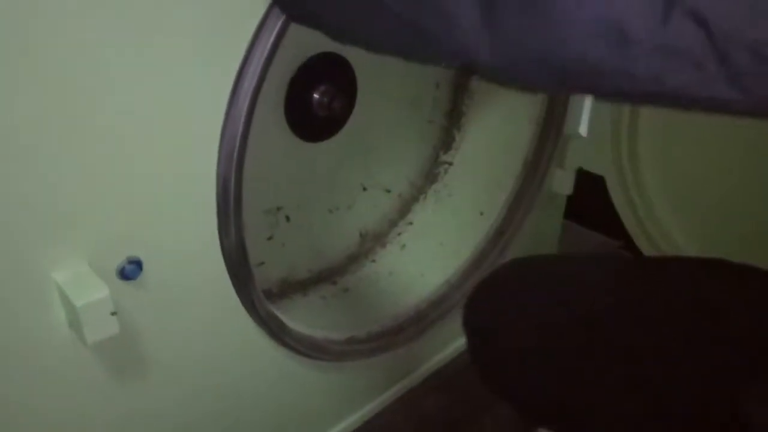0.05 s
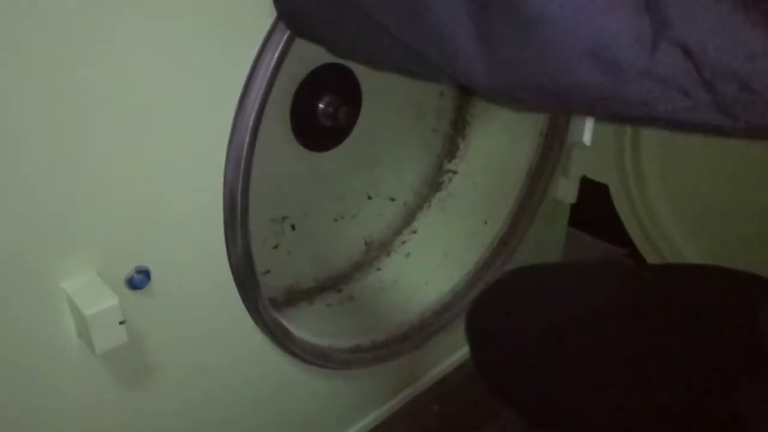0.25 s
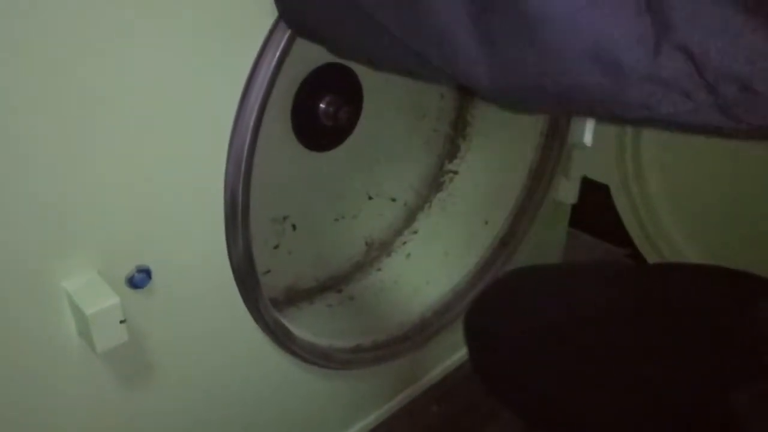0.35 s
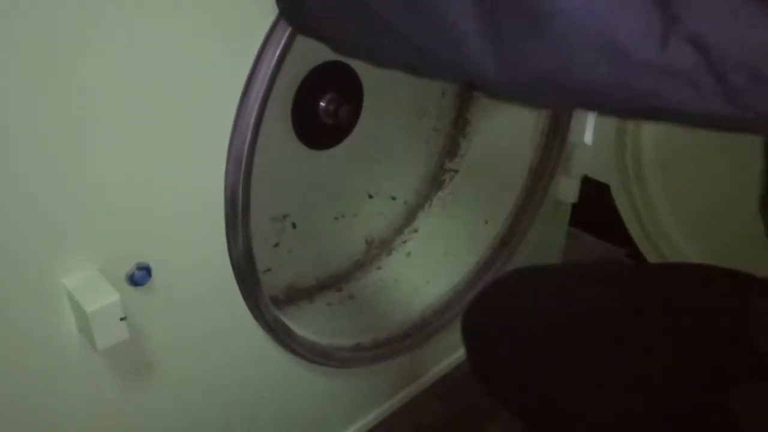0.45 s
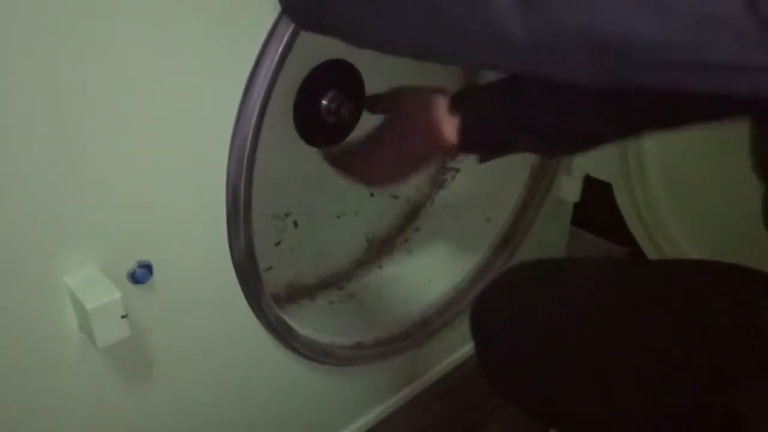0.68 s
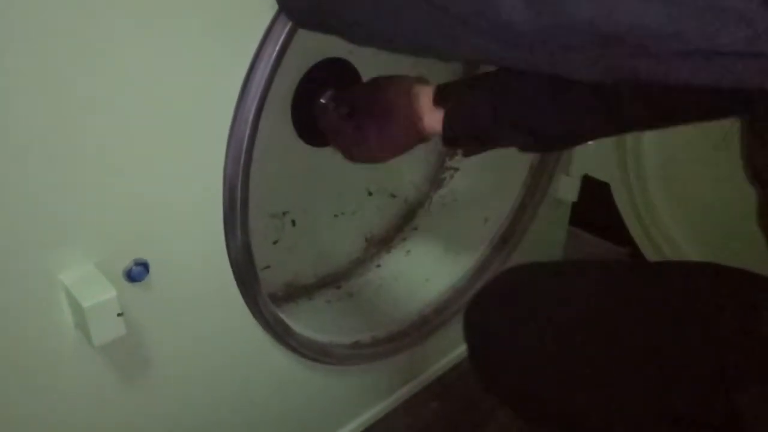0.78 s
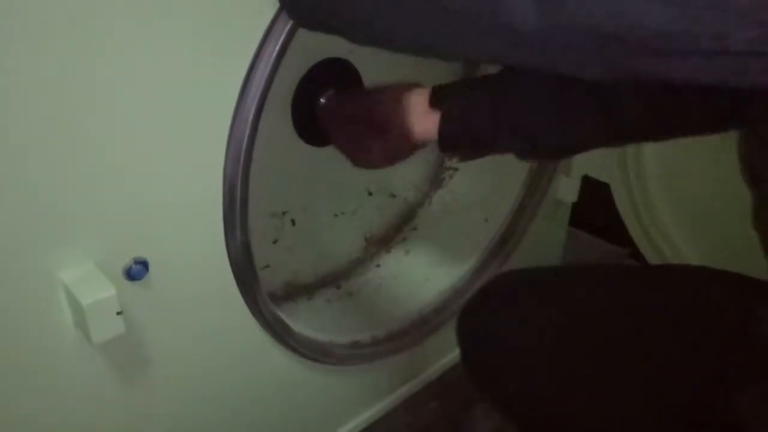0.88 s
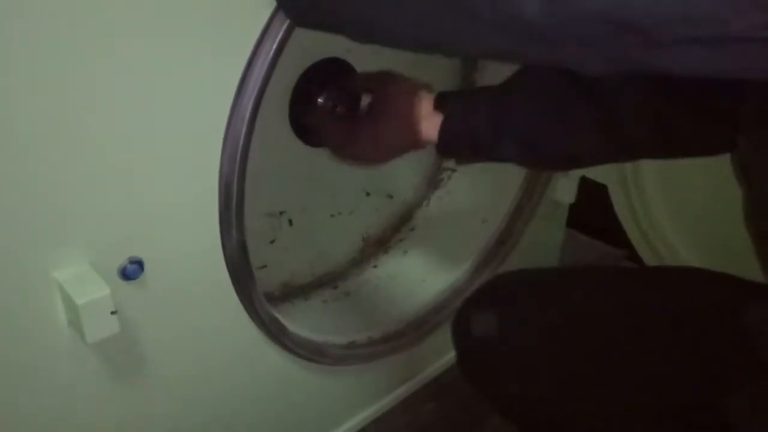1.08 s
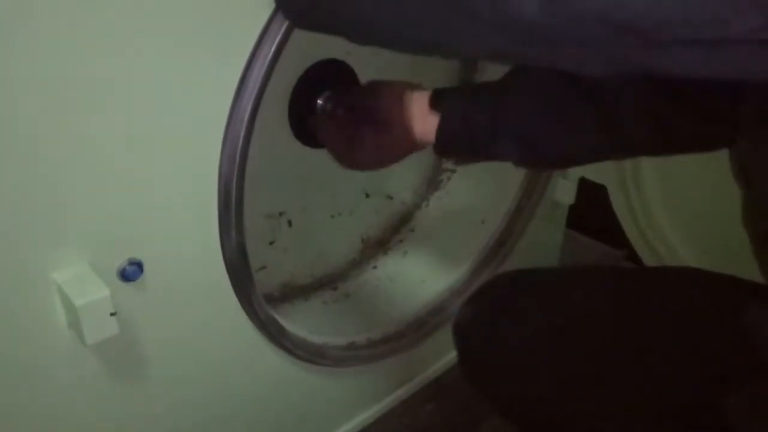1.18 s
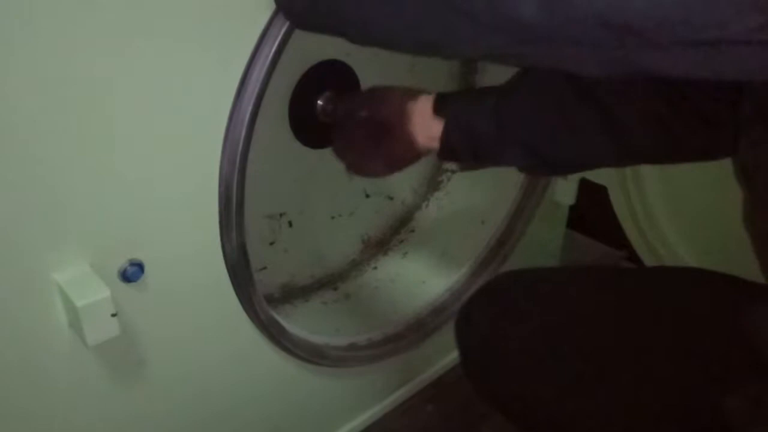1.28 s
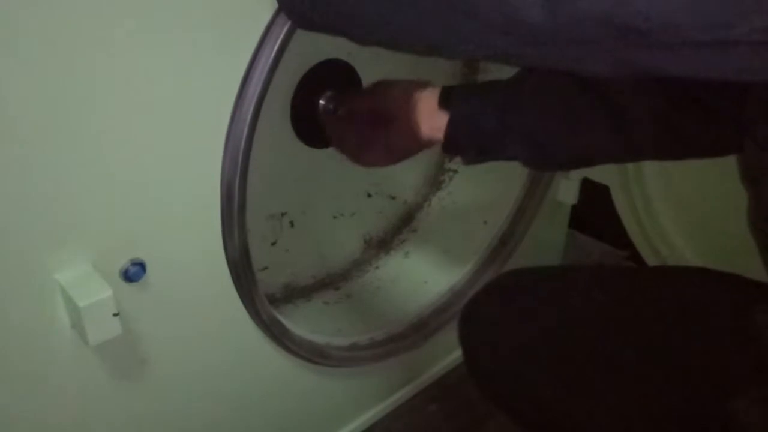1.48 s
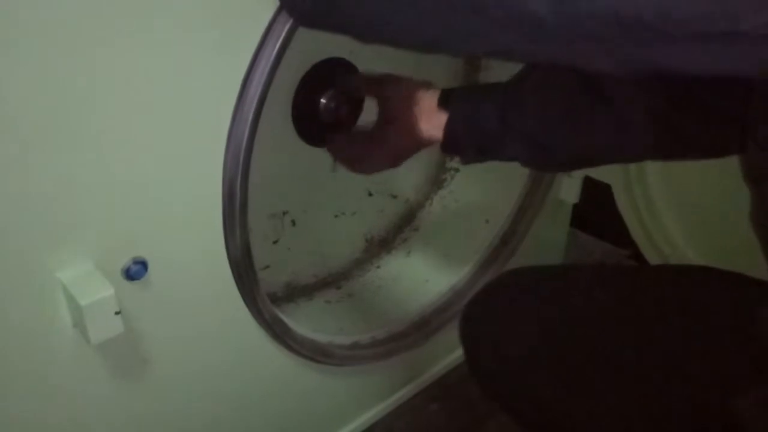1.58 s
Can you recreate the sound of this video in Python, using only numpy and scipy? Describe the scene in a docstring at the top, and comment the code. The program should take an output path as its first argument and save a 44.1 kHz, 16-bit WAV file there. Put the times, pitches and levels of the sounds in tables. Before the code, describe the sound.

A steel machine door clanks shut and rings, followed by one small knob click.

```python
"""Steel machine door clanking shut

A first contact, then the full blow and a short rattle: the steel cracks, the frame knocks, and the
door rings on into a hard-walled workshop over a machine hum. A hand brushes the door; its knob clicks
once, with a faint after-tick. A limiter ducks just ahead of the blows and recovers as the ring dies."""
import sys
import numpy as np
from scipy import signal
from scipy.fft import rfft, irfft, next_fast_len
from scipy.io import wavfile
from scipy.ndimage import uniform_filter1d, minimum_filter1d

SR = 44100
rng = np.random.default_rng(int(sys.argv[2]) if len(sys.argv) > 2 else 0)


def generate_wav(signal):
    """Clip the signal to [-1, 1] and save it as 16-bit WAV at the path in sys.argv[1]."""
    frames = np.transpose(np.atleast_2d(signal))
    scaled = np.clip(frames, -1, 1) * 32767
    pcm = np.round(scaled).astype(np.int16)
    wavfile.write(sys.argv[1], SR, pcm)


N = 72765

# blows of the door (time [s], level [dB], crack re blow [dB], frame knock re blow [dB])
BLOWS = [(0.2354, -5.5, 0, -9), (0.3238, -3, 8, 5), (0.3425, -12, 6, -8), (0.3622, -13, 17, -6)]
DIRECT_LIKENESS = .32  # left-right correlation of direct sounds above the bass


def door():
    """Each blow cracks, knocks the frame and sets the steel ringing; rattles add short cracks."""
    # light rattles as the door seats (time [s], level [dB])
    rattles = [(0.248, 3.5), (0.2587, -5), (0.2686, -6), (0.2915, -0.5), (0.3515, -4), (0.3795, -1),
               (0.606, -5), (0.6703, -18.5), (0.728, -16)]
    # colour of the bare contact (frequency [Hz], level [dB])
    crack_colour = [(120, -35), (400, -0.5), (1100, -8.5), (2000, -13), (3600, 8), (4500, -14.5),
                    (5500, -25), (7000, -20), (8500, -50), (15000, -49)]
    # colour of the frame's dull knock (frequency [Hz], level [dB])
    knock_colour = [(50, -45), (130, -28), (300, -8), (600, -7), (850, -5), (1120, 2), (1500, -8),
                    (2500, -20), (8000, -60)]
    # clear modes of the door (frequency [Hz], level [dB], t60 [s])
    door_modes = [(226, -22, 1.6), (1520, -20, 1.0), (1799, -18.5, 1.3), (1851, -20, 1.3), (2112, -22, 1.6),
                  (2172, -18, 1.4), (2441, -19, 1.4), (2913, -17, 1.1), (3075, -15, 1.2), (3340, -14, 1.0),
                  (3446, -16, 1.0), (3479, -14, 1.1), (3746, -15, 1.2), (4676, -19, 1.75),
                  (5254, -18, 1.05), (7601, -27, .72), (7690, -33, .65), (8597, -39, .72), (9711, -35, .65),
                  (11298, -29, .46), (12060, -35, .5), (14620, -27, .28), (15432, -33, .45)]
    contacts = [(s, db + crack_db) for s, db, crack_db, _ in BLOWS] + rattles
    crack_power = sum((undb(db) * fade(since(s), t60=.04)) ** 2 for s, db in contacts)
    cracks = noise(crack_colour, DIRECT_LIKENESS) * np.sqrt(crack_power)
    knock_level = sum(undb(db + knock_db) * fade(since(s), t60=.031) for s, db, _, knock_db in BLOWS)
    knocks = noise(knock_colour) * knock_level
    ring = sum(undb(db) * ring_envelope(t60, build_s=.07) * echoing_tone(hz)
               for hz, db, t60 in door_modes)
    return cracks + knocks + undb(3) * ring + dense_ring()


def dense_ring(bands=9):
    """Countless modes of door and hall bloom into a wash after each blow; the treble dies first."""
    # colour of the wash (frequency [Hz], level [dB])
    colour = [(100, -25.5), (220, -8.5), (500, -11), (900, -11), (1450, -8.5), (2200, -2), (3500, -1.5),
              (4400, -1), (5000, -11.5), (6300, -13), (7300, -30.5), (8200, -39), (15000, -54)]
    # its decay (frequency [Hz], t60 [s])
    decay = [(200, 1.26), (700, 1.5), (2200, 1.192), (3800, 1.025), (6500, 0.86), (10000, 0.3)]
    size = next_fast_len(N, True)
    spectrum, hz = rfft(noise(colour), size), np.arange(size // 2 + 1) * SR / size
    centres = np.geomspace(decay[0][0], decay[-1][0], bands)
    wash = 0
    for centre, weights in zip(centres, np.eye(bands)):
        band = irfft(spectrum * along(np.c_[centres, weights], hz), size)[:, :N]
        wash = wash + band * ring_envelope(along(decay, centre), build_s=.012)
    return undb(1.5) * wash


def ring_envelope(t60, build_s):
    """Amplitude of a resonance that every blow feeds with energy: it builds up, then dies away."""
    feed = np.zeros(N)
    for s, db, _, _ in BLOWS:
        feed[int(s * SR)] += undb(db) ** 2
    decay, build = np.exp(-2 * np.log(1000) / (t60 * SR)), np.exp(-1 / (build_s * SR))
    energy = signal.lfilter([1], [1, -decay], feed)
    return np.sqrt(signal.lfilter([1 - build], [1, -build * decay], energy))


def echoing_tone(hz, flutter_hz=20, steady_gain=.9):
    """A partial heard through the hall: a steady part plus reflections that flutter on each side."""
    echoes = np.array([waver(flutter_hz) + 1j * waver(flutter_hz) for _ in range(2)]) / np.sqrt(2)
    steady = steady_gain * np.exp(1j * rng.uniform(0, 2 * np.pi, (2, 1)))
    return np.real((steady + echoes) * np.exp(2j * np.pi * hz * since(0))) / np.hypot(1, steady_gain)


def knob():
    """A small metal tick with a short ring that hangs on in the hall."""
    # click and faint after-tick (time [s], level [dB])
    clicks = [(1.322, -19.5), (1.5, -48)]
    # modes of the knob (frequency [Hz], level [dB], t60 [s])
    knob_modes = [(1866, 2, 0.053), (1903, 8, 0.043), (2860, -21, 0.11), (4770, -2.5, 0.019),
                  (9750, -34, 0.046), (14750, -11.5, 0.06)]
    # colour of the tick (frequency [Hz], level [dB])
    tick_colour = [(300, -27), (900, 1.5), (1900, 5.5), (3000, 1), (4800, 2), (6500, -15.5), (8500, -41),
                   (15000, -24)]
    # colour of its tail in the hall (frequency [Hz], level [dB])
    tail_colour = [(300, -37), (900, -16), (1600, -16), (1830, 1.5), (1980, 4), (2150, -14.5), (4800, -23),
                   (6500, -36.5), (8500, -59), (15000, -59)]
    tick = undb(-.5) * noise(tick_colour, DIRECT_LIKENESS)
    tail = undb(-15.5) * noise(tail_colour)
    out = 0
    for s, db in clicks:
        age = since(s)
        click = modes(knob_modes, age) + tick * fade(age, t60=.04) + tail * fade(age, t60=1)
        out = out + undb(db) * click
    return out


def hand():
    """Hand and sleeve rub the door in soft, brief swells."""
    # brush strokes (time [s], half length [s], level [dB])
    strokes = [(0.991, 0.013, -31.5), (1.191, 0.0094, -42), (1.303, 0.027, -41), (1.502, 0.0025, -36),
               (1.567, 0.025, -39.5)]
    # colour of the rubbing (frequency [Hz], level [dB])
    colour = [(300, -7), (900, 8.5), (2000, 2.5), (3700, 8.5), (5000, -6), (6500, -9), (8000, -36.5),
              (15000, -28.5)]
    swells = sum(undb(db) * np.exp(-.5 * ((since(0) - s) / half) ** 2) for s, half, db in strokes)
    return noise(colour, DIRECT_LIKENESS) * swells


def workshop(drone_hz=271.5, waver_hz=9, waver_db=1.2, drift_rad=.3, rumble_fall_db_per_s=.85):
    """Wavering machine tones over the slowly sinking rumble of the hall."""
    # contour of the main hum (time [s], level [dB])
    drone_contour = [(0, -34.5), (0.2, -35.5), (0.6, -35), (1.05, -43), (1.2, -39), (1.42, -40.5),
                     (1.56, -34.5), (1.65, -37.5)]
    # weaker machine tones (frequency [Hz], level [dB])
    weak_tones = [(97, -53.5), (198, -47), (352, -50.5), (801, -53), (901, -54)]
    # colour of the rumble (frequency [Hz], level [dB])
    rumble_colour = [(25, -27), (45, -15), (90, -5.5), (130, -7), (200, -4.5), (320, -1), (480, -11),
                     (800, -15), (1400, -20), (2000, -22), (3800, -24), (5200, -37), (6500, -43),
                     (8000, -79), (15000, -67)]
    t = since(0)
    drone_db = np.interp(t, *np.array(drone_contour).T)
    hum = 0
    for hz, db in [(drone_hz, drone_db)] + weak_tones:
        amplitude = np.sqrt(2) * undb(db + waver_db * waver(waver_hz))
        hum = hum + amplitude * np.sin(2 * np.pi * hz * t + drift_rad * waver(waver_hz))
    return hum + noise(rumble_colour) * undb(-36 - rumble_fall_db_per_s * t)


def modes(table, age):
    """Decaying partials that reach left and right in a chance phase."""
    phases = rng.uniform(0, 2 * np.pi, (len(table), 2, 1))
    return sum(undb(db) * fade(age, t60) * np.sin(2 * np.pi * hz * age + phase)
               for (hz, db, t60), phase in zip(table, phases))


def noise(colour, likeness=0, mono_below_hz=460):
    """Coloured stereo noise, rms 1, narrowing to mono in the bass."""
    size = next_fast_len(N, True)
    hz = np.arange(size // 2 + 1) * SR / size
    alike = np.clip(likeness + 1 / (1 + (hz / mono_below_hz) ** 4), 0, 1)
    mid, side = rfft(rng.standard_normal((2, size)))
    stereo = mid * np.sqrt(1 + alike) + side * np.sqrt(1 - alike) * np.array([[1], [-1]])
    out = irfft(stereo * undb(along(colour, hz)), size)[:, :N]
    return out / out.std()


def waver(rate_hz):
    """Smoothed sample-and-hold modulation, rms 1."""
    hold = int(SR / rate_hz)
    held = rng.standard_normal(256)[np.arange(N) // hold % 256]
    out = uniform_filter1d(uniform_filter1d(held, hold), hold)
    return (out - out.mean()) / out.std()


def fade(age, t60, attack_s=.0017):
    """A very quick rise and an exponential decay."""
    return (1 - np.exp(-(age / attack_s) ** 2)) * np.exp(-np.log(1000) * age / t60)


def since(start):
    """Seconds since a moment, zero before it."""
    return np.maximum(np.arange(N) / SR - start, 0)


def along(table, hz):
    """Read (frequency, value) points on a log-frequency axis."""
    table = np.array(table, float)
    return np.interp(np.log(hz + 1e-3), np.log(table[:, 0]), table[:, 1])


def undb(db):
    """Decibels to gain."""
    return 10 ** (np.asarray(db) / 20)


def scene():
    """Door, knob, hand and workshop together."""
    return door() + knob() + hand() + workshop()


def record(dry):
    """A look-ahead limiter with slow release, a weaker right channel and a steep top cut."""
    limit_db, detect_s, lookahead_s, release_db_per_s = -10, .003, .011, 30.5
    right_db, top_hz = -9, 15900
    power = uniform_filter1d(dry ** 2, int(detect_s * SR), axis=1).max(axis=0)
    duck_db = np.minimum(limit_db - 10 * np.log10(np.maximum(power, 1e-12)), 0)
    duck_db = minimum_filter1d(duck_db, 2 * int(lookahead_s * SR) + 1)
    recovery_db = release_db_per_s * since(0)
    gain_db = uniform_filter1d(np.minimum.accumulate(duck_db - recovery_db) + recovery_db, size=64)
    out = dry * undb(gain_db) * undb([[0], [right_db]])
    return signal.sosfilt(signal.ellip(8, .2, 70, top_hz, fs=SR, output="sos"), out)


dry = scene()
out = record(dry)
generate_wav(out)
```